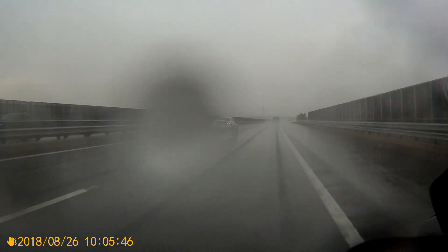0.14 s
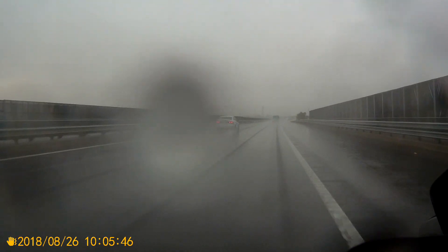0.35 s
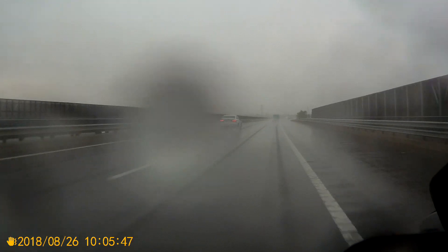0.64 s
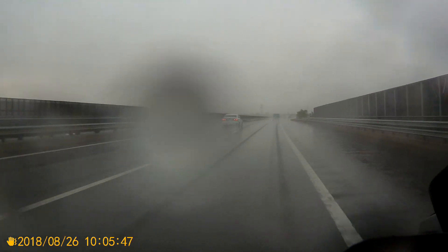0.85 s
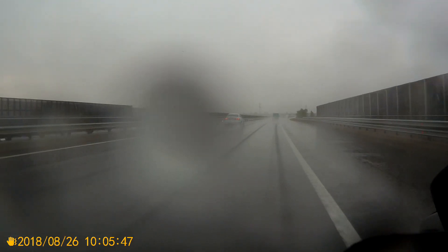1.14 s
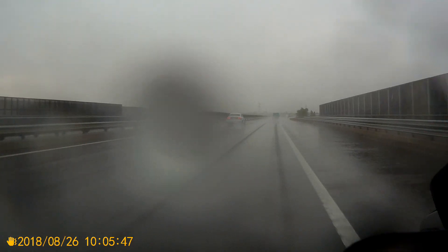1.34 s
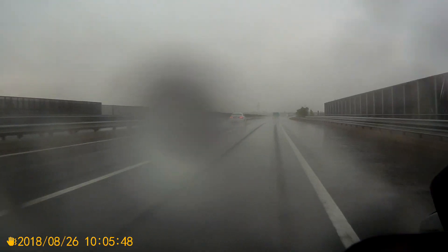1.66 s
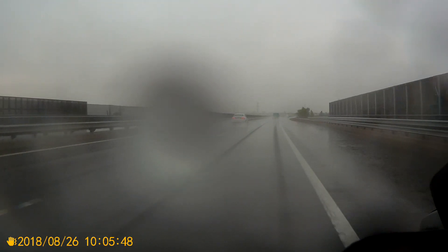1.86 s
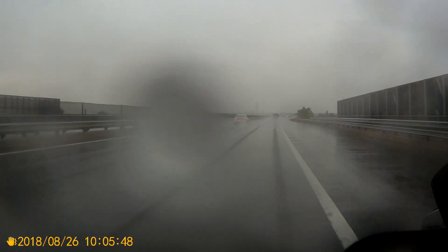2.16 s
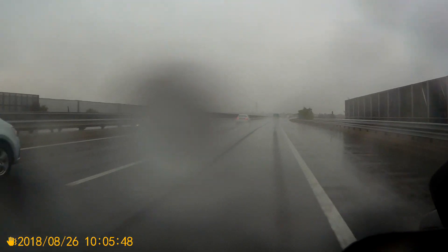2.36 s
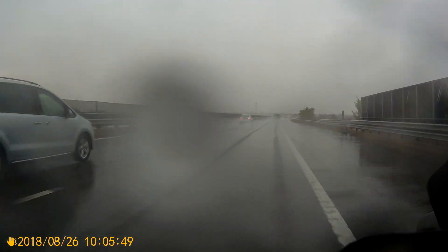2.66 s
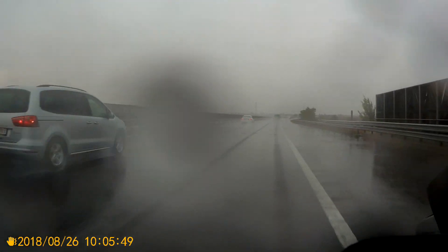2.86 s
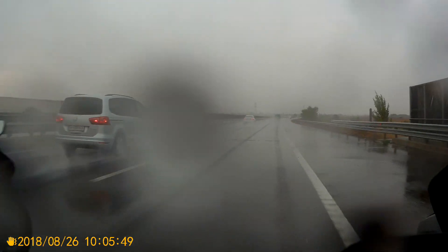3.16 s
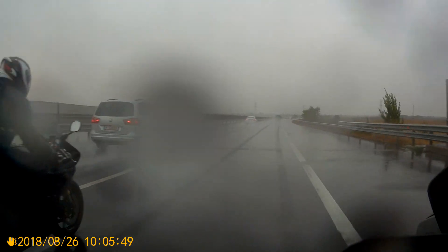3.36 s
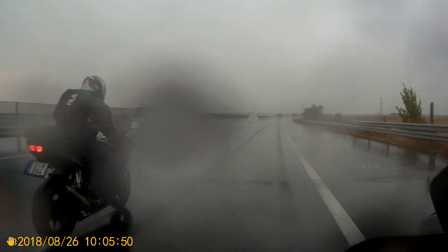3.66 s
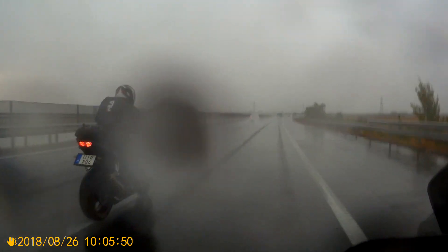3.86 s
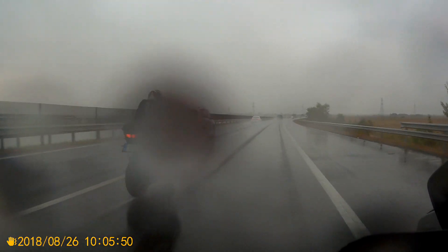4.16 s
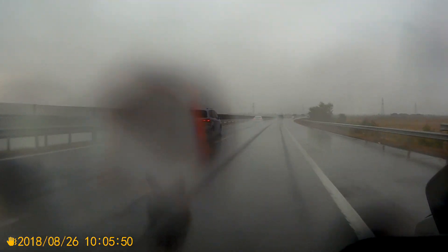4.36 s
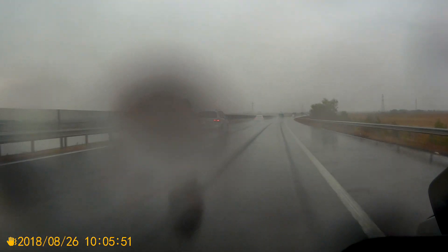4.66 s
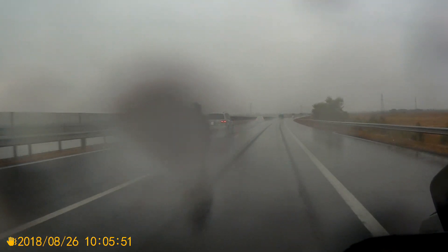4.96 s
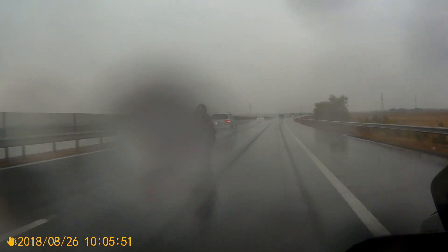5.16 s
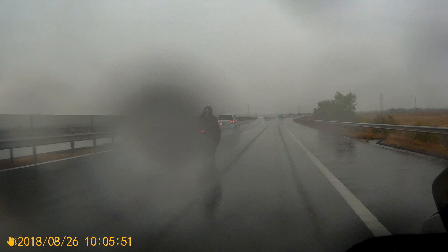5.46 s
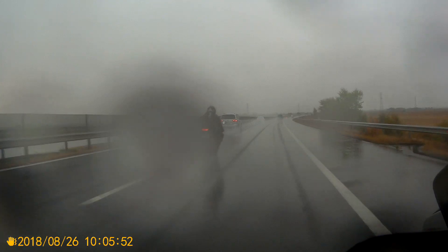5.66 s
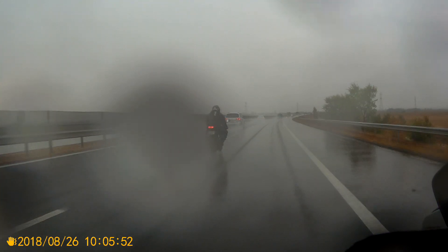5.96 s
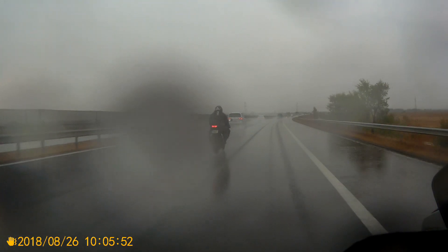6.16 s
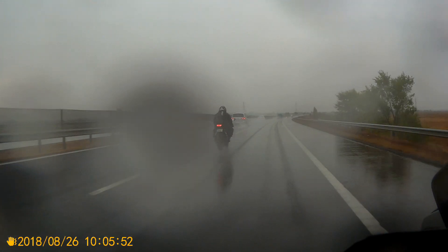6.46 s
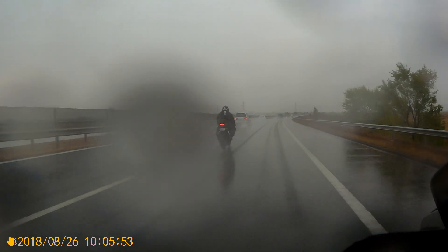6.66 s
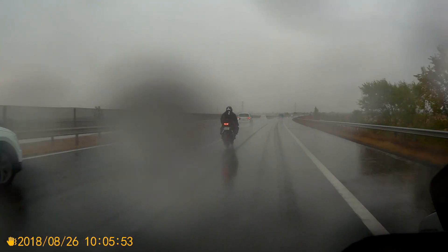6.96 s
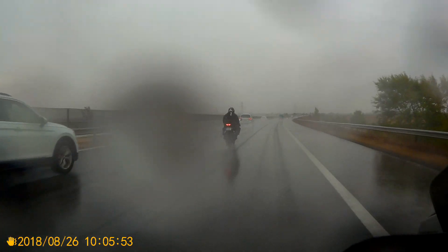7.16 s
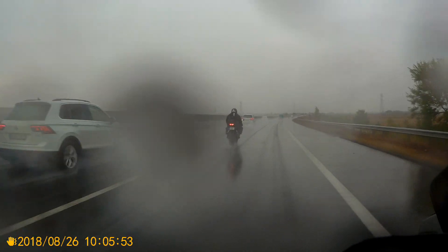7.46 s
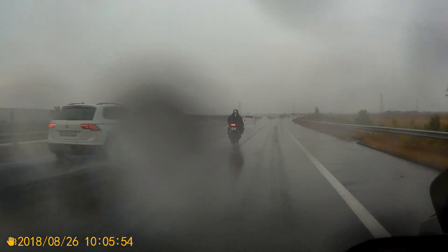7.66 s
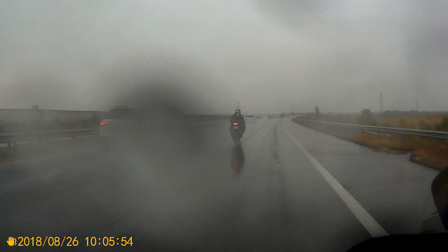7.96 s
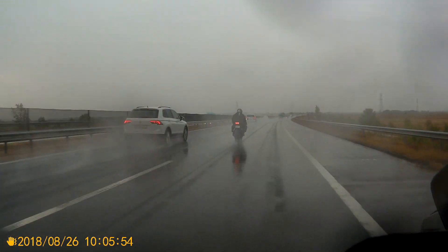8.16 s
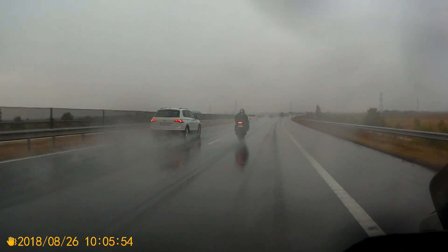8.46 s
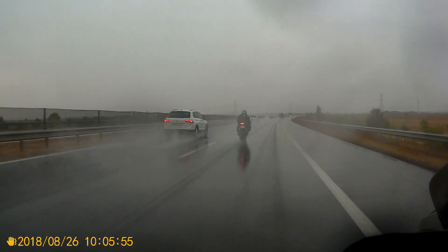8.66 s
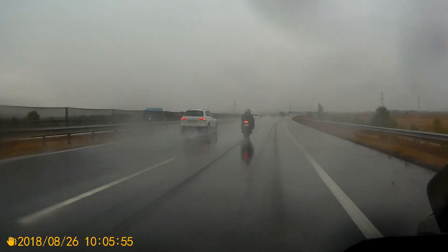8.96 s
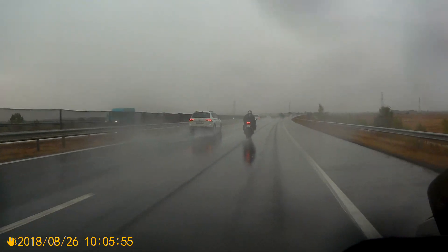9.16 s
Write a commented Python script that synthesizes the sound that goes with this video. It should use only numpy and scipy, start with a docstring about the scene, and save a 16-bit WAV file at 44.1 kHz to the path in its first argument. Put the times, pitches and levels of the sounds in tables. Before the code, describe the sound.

Steady throbbing motorbike engine and nasal gear whine over rumbling road noise, while rain snaps and crackles on a sealed camera and bumps thud softly.

```python
"""A motorcycle engine drones steadily at once, on a wet motorway, heard by a small camera sealed in a case
on the bike. Sines locked to the engine cycle make the exhaust and gear whine; firing clatter, throbbing
noise with a repeating pattern, rings in the camera mount. Coloured noise makes road roar, faint tyre hiss
and wind buffeting, and noise rings in the frame. Raindrops tick and crackle on the case, joints thud as
low decaying sines, and road jolts and grit strike short rings."""
import sys
import numpy as np
from scipy import signal
from scipy.fft import rfft, irfft
from scipy.io import wavfile

SR = 44100
rng = np.random.default_rng(int(sys.argv[2]) if len(sys.argv) > 2 else 0)


def to_wav(s):
    """Save 16-bit WAV."""
    ch = np.atleast_2d(s).T  # columns
    pcm = np.round(np.clip(ch, -1, 1) * 32767)  # PCM
    wavfile.write(sys.argv[1], SR, pcm.astype(np.int16))


N = 411012
TIME_S = np.arange(N) / SR


def from_db(db):
    """Turn decibels into an amplitude factor."""
    return 10 ** (np.asarray(db) / 20)


def rms_one(x):
    """Scale a signal to an rms of 1."""
    return x / np.sqrt(np.mean(x ** 2) + 1e-20)


def in_time(rows):
    """Draw straight lines between the (time, value) rows of a table."""
    s, values = np.transpose(rows)
    return np.interp(TIME_S, s, values)


def blow_at(s, level_db):
    """A single click at a given time."""
    blow = np.zeros(N)
    blow[round(s * SR)] = from_db(level_db)
    return blow


def drift(rate_hz):
    """Slow chance of spread 1: noise at every 40th sample through a double one-pole low-pass."""
    pole = np.exp(-80 * np.pi * rate_hz / SR)
    noise = rng.standard_normal(N // 40 + 2002)
    slow = signal.lfilter([1], [1, -2 * pole, pole * pole], noise)[2000:]  # drop the filter's start
    return np.interp(np.arange(N) / 40, np.arange(len(slow)), rms_one(slow))


def ring(clicks, hz, t60):
    """A struck mode: a unit click starts a sine of height 1 that decays by 60 dB in t60 seconds."""
    pole, turn = from_db(-60 / (t60 * SR)), 2 * np.pi * hz / SR
    # the tiny offset keeps the filter clear of denormal numbers
    return signal.lfilter([0, np.sin(turn)], [1, -2 * pole * np.cos(turn), pole * pole], clicks + 1e-18)


def resonate(x, hz, width_hz):
    """A resonance applied twice, so its skirts fall steeply; gain 1 on top."""
    pole = np.exp(-np.pi * width_hz * 1.55 / SR)  # each stage is wider, as two in a row narrow the peak
    gain = (1 - pole * pole) / 2
    stage = [gain, 0, -gain, 1, -2 * pole * np.cos(2 * np.pi * hz / SR), pole * pole]
    return signal.sosfilt([stage, stage], x)


def ringing(shake, modes):
    """A body's resonances in parallel, signs alternating; rms 1."""
    out = 0
    for k, (hz, width_hz, level_db) in enumerate(modes):
        out = out + (-1) ** k * from_db(level_db) * resonate(shake, hz, width_hz)
    return rms_one(out)


def coloured(spectrum, patchy_db, rate_hz):
    """Noise of the given colour, split in overlapping octave parts that each flicker on their own; rms 1."""
    hz, points = np.maximum(np.fft.rfftfreq(N, 1 / SR), 1), np.array(spectrum)
    level_db = np.interp(np.log(hz), np.log(points[:, 0]), points[:, 1], left=-150, right=-150)
    shaped = from_db(level_db) * rfft(rng.standard_normal(N))
    out = 0
    for octave in np.arange(np.floor(np.log2(points[0, 0])), np.log2(points[-1, 0]) + 1):
        part = np.cos(np.pi / 2 * np.clip(np.log2(hz) - octave, -1, 1)) ** 2
        out = out + from_db(patchy_db * drift(rate_hz)) * irfft(shaped * part, N)
    return rms_one(out)


def orders(cycle, table, waver_db, slip, sweep, smeared_to=np.inf):
    """Sines locked to the engine cycle waver and slip in phase; sweep smears the pulse up to an order; rms 1."""
    out = 0
    for k, level_db in table:
        phase = 2 * np.pi * k * cycle + sweep * min(k, smeared_to) ** 2 + slip * drift(3.45)
        out = out + from_db(level_db + waver_db * drift(2.86)) * np.cos(phase)
    return rms_one(out)


# Engine speed on the motorway: (time [s], speed [rpm])
ENGINE_SPEED = [(0.0, 3666), (0.9, 3648), (1.8, 3634), (2.5, 3618), (3.4, 3606), (3.9, 3614), (4.2, 3629),
                (4.8, 3648), (5.5, 3673), (6.6, 3700), (7.2, 3707), (7.8, 3701), (8.2, 3691), (8.7, 3667),
                (9.0, 3648), (9.32, 3639)]
CRUISE_RPM = 3650


def engine_motion():
    """Engine speed above cruise (rpm) and running count of cycles; a four-stroke cycle takes two turns."""
    rpm = in_time(ENGINE_SPEED)
    return rpm - CRUISE_RPM, np.cumsum(rpm / 120) / SR


# Exhaust orders: (multiple of the cycle rate, relative level [dB])
EXHAUST_ORDERS = [(1, -6), (2, -11.5), (3, -21), (4, -5), (5, -25), (6, -7), (7, 0), (8, -1), (9, -6),
                  (10, -10), (11, -11), (12, -5), (13, -9), (14, -11), (15, -6), (16, -10), (17, -16),
                  (18, -15), (19, -21), (20, -27)]
# The pipe smears the low orders: level waver [dB], phase slip [rad], phase sweep [rad], last smeared order
EXHAUST_STEADINESS = dict(waver_db=1.6, slip=.2, sweep=.6, smeared_to=12)
EXHAUST_DB, EXHAUST_DB_PER_RPM = -23.5, 0.0232  # level at cruise, rise with engine speed


def exhaust(cycle, above_cruise_rpm):
    """Exhaust pulses repeat each cycle, so they sum to orders of it; they grow with engine speed."""
    level = from_db(EXHAUST_DB + EXHAUST_DB_PER_RPM * above_cruise_rpm)
    return level * orders(cycle, EXHAUST_ORDERS, **EXHAUST_STEADINESS)


# Resonances of the camera mount: (frequency [Hz], width [Hz], relative level [dB])
MOUNT_MODES = [(713, 48, -18.5), (1244, 60, -19), (1387, 45, -0.5), (1460, 88, -6), (1556, 174, -4.5),
               (1736, 143, -17), (1830, 173, -12), (2367, 324, -22.5), (3369, 92, -23)]


def mount(shake):
    """The camera mount rings at its resonances when shaken; rms 1."""
    return ringing(shake, MOUNT_MODES)


# Gear teeth: (multiple of the cycle rate, level before the mount [dB])
GEAR_TEETH = [(45, 2), (48, 5), (63, 1)]
WHINE_DB, CLATTER_DB = -29, -24  # levels at cruise
CLATTER_DB_PER_RPM = 0.0175  # rise of both with engine speed


def gear_whine(cycle, above_cruise_rpm):
    """Gear teeth mesh at fixed multiples of the cycle rate and set the mount ringing."""
    level = from_db(WHINE_DB + CLATTER_DB_PER_RPM * above_cruise_rpm)
    return level * mount(orders(cycle, GEAR_TEETH, waver_db=0.6, slip=0.24, sweep=0.3))


def firing_clatter(cycle, above_cruise_rpm):
    """Firings shake the camera mount: a pattern that repeats every cycle, plus noise that throbs with it."""
    turn = 2 * np.pi * cycle
    throb = 1 + 0.19 * np.cos(turn) + 0.45 * np.cos(2 * turn + 0.38) + 0.26 * np.cos(4 * turn + 0.72)
    equal_orders = [(k, 0) for k in range(39, 66)]
    pattern = orders(cycle, equal_orders, waver_db=2.0, slip=0.66, sweep=np.pi / 2 * 1.02)
    shake = throb * rng.standard_normal(N) + from_db(-14.5) * pattern
    return from_db(CLATTER_DB + CLATTER_DB_PER_RPM * above_cruise_rpm) * mount(shake)


# Colour of the road roar: (frequency [Hz], relative density [dB])
ROAR_COLOUR = [(60, -26), (80, -6.5), (110, -11), (140, -6), (200, -7), (290, -7.5), (410, -15.5),
               (450, -7), (560, -9), (630, -20.5), (900, -22), (1150, -24.5), (1400, -53)]
# The roar swells and sinks: (time [s], rise [dB])
ROAR_RISE = [(0, 3), (.6, -0.5), (2.1, 1.1), (2.6, -2), (4.0, 0), (6.0, -0.9), (7.3, -1.1), (8.3, 1),
             (9.32, 2)]
ROAR_DB = -32


def road_roar():
    """Road roar is low coloured noise that flickers in octave parts and swells and sinks."""
    return from_db(ROAR_DB + in_time(ROAR_RISE)) * coloured(ROAR_COLOUR, patchy_db=2.0, rate_hz=9.1)


# Resonances of frame and fairing: (frequency [Hz], width [Hz], relative level [dB])
FRAME_MODES = [(258.8, 13.4, 0.5), (229, 23, -15), (344.8, 26.6, -1), (386, 23, -7), (522, 34, -20)]
FRAME_DB = -29  # wanders about this level


def frame_ring():
    """The road shakes frame and fairing at random, and they ring at their resonances."""
    return from_db(FRAME_DB + 2.2 * drift(9.1)) * ringing(rng.standard_normal(N), FRAME_MODES)


# Colour of the tyre spray: (frequency [Hz], relative density [dB])
SPRAY_COLOUR = [(1000, -18.5), (1700, 0), (1940, -16), (2100, -25.5), (2490, -12), (2680, -17),
                (3400, -18.5), (4280, -29.5), (7420, -39), (8980, -50), (10400, -46), (12100, -50),
                (14900, -38), (15700, -46), (16500, -77)]
SPRAY_DB = -34  # wanders about this level


def tyre_spray():
    """Tyre spray is a faint hiss of coloured noise with small, quick changes of level."""
    return from_db(SPRAY_DB + 0.44 * drift(4.5)) * coloured(SPRAY_COLOUR, patchy_db=1.2, rate_hz=20.0)


# Colour of the wind buffeting: (frequency [Hz], relative density [dB])
BUFFET_COLOUR = [(12, -32), (20, -6), (28, -2), (45, -0.5), (62, 2), (75, -21), (110, -40)]
# Two gusts, at the start and near 4 s; a row of 0 dB adds nothing: (time of the top [s], rise [dB])
WIND_GUSTS = [(0.0, 7), (3.95, 5), (4.6, 0)]
GUST_S, BUFFET_DB = 0.2, -32.5  # time to fall to 1/e of the dB rise; level between gusts


def wind_buffet():
    """Wind buffets as very low noise, raised by two bell-shaped gusts."""
    gust_db = sum(db * np.exp(-((TIME_S - s) / GUST_S) ** 2) for s, db in WIND_GUSTS)
    return from_db(BUFFET_DB + gust_db) * coloured(BUFFET_COLOUR, patchy_db=1.0, rate_hz=6.4)


# Larger raindrops on the case; knock, body and fizz are relative to the drop's level:
# (listed time [s], level [dB], knock [dB], body [dB], fizz [dB])
LARGE_DROPS = [(0.0291, -36, -7, -9, -6), (0.2239, -17, -14, -7, -16), (0.739, -32.5, -12, -10, -12),
               (0.7971, -30, -3, 5.5, -16), (0.9268, -6.5, -17, -8.5, -19.5), (1.3159, -33, -11.5, -3, -27),
               (1.4413, -12.5, -11, 0, -55), (1.5579, -32.5, -14, -7, -6), (2.1465, -25.5, -14, -15, -19),
               (2.4239, -29, -16, -11, -12), (2.4703, -33, -4, -2, -50), (2.4885, -13.5, -5, -8, -51),
               (2.7038, -25.5, -18, -6, -12), (2.7926, -11, 4.5, -2, -47), (2.9375, -34, -13, -6, -7),
               (2.9891, -35, -11, -2, -8), (3.1901, -33, -10, -1, -18), (3.5404, -36, -11, -4, -4),
               (3.575, -34, -6, 9, -16), (3.714, -33.5, -8, 4, -10), (3.7538, -31, -8, -8, -14),
               (3.7986, -24, -21, -3, -8.5), (3.9724, -33, -8, 7, -35), (4.0741, -38, -12, -4, -7),
               (4.1774, -26.5, -15, -3, -12), (4.188, -33, -12, -5, -10), (4.2263, -30, -12, 1, -17),
               (4.4109, -15, -12, -13, -10), (4.5727, -18, -26, -11, -11), (4.689, -25.5, -17, -6, -11),
               (4.8883, -22, -20, -16, -13), (5.013, -17, -25, -16, -12.5), (5.1698, -25, -11.5, -1, -17),
               (5.8586, -25, -15, -13, -17), (5.9374, -35, -12, -11, -9), (6.074, -32, -8, -11, -10),
               (6.113, -32, -12, -16, -11), (6.2042, -16.5, -5, -16, -13.5), (6.5418, -31, -17, -13, -8),
               (6.8264, -25, 6, 1.5, -14), (6.8731, -23.5, -16, -4, -8.5), (7.008, -28, -6, -19, -19),
               (7.1117, -24, -18, 2.5, -16), (7.245, -29.5, -20, -19.5, -7), (7.346, -24, -16, -15, -14),
               (7.4165, -23, -20, -23, -15), (7.651, -31, -1, -7, -36), (7.6725, -2.5, -6.5, -11.5, -58),
               (7.9322, -25.5, -16, -4, -14), (8.0292, -31, -11, -9, -9), (8.0511, -11, -9, -2.5, -18),
               (8.1479, -31.5, -14, -9, -8), (8.3539, -17.5, -21, -12, -15), (8.5, -30, -14, -18, -8),
               (8.6113, -30, -8, 0, -16), (8.704, -33.5, -10, -11, -7), (8.777, -33.5, -19, -12, -5),
               (8.8327, -31, -10, -6, -12), (8.984, -26, -14, -10, -15), (9.0444, -21.5, -21, -6, -11),
               (9.0623, -30, -5, -7, -18), (9.1022, -5, -4, -9.5, -57), (9.2895, -12, -25, -19, -18.5)]
# Middle knock, body and fizz of a fine drop, relative to its level: [dB] each
FINE_DROP_SHARES = (-9, -11, -12)
# Knock, body, crack, fizz and a soft treble hiss:
# (low edge [Hz], high edge [Hz], tap gain [dB], splash gain [dB], rise and fade [s])
SPLASH_BANDS = [(985, 2340, 29, 11, 0.00023), (1340, 4120, 23, 7.5, 0.00078),
                (3630, 7480, 10.5, -6, 0.00061), (8800, 20000, 22, 5.5, 0.00045),
                (4800, 13000, -21, -14.5, 0.0098)]
# Camera case resonances, added to the splashes: (frequency [Hz], width [Hz], gain [dB])
CASE_MODES = [(3170, 530, -7.5), (6380, 2800, -6.5), (10760, 1500, -8), (12900, 400, -5), (15200, 690, 5)]
FINE_PER_S, FINE_DB, FINE_SPREAD_DB, FINE_COLOUR_DB = 22, -49.5, 4.0, 8.0
ONSET_DELAY_S = 0.00073  # every tap and splash starts this long after its listed time


def drizzle():
    """Fine drops land at random, mostly small, with chance colour; rows as in LARGE_DROPS."""
    at = np.flatnonzero(rng.random(N) < FINE_PER_S / SR)
    luck = rng.random((len(at), 4))
    level_db = FINE_DB + FINE_SPREAD_DB * np.minimum(-np.log(1 - luck[:, 0]), 3)
    shares_db = FINE_DROP_SHARES + FINE_COLOUR_DB * (2 * luck[:, 1:] - 1)
    return np.column_stack([at / SR, level_db, shares_db])


def rain():
    """Each drop taps and crackles in four bands; a faint treble hiss swells and fades; the case resonates."""
    s, drop_db, knock_db, body_db, fizz_db = np.concatenate([LARGE_DROPS, drizzle()]).T
    at = np.minimum(np.round((s + ONSET_DELAY_S) * SR).astype(int), N - 1)
    crackle = rng.choice([-1., 1.], N)
    shares_db = (knock_db, body_db, 0, fizz_db, fizz_db)  # the soft hiss shares the fizz level
    out = 0
    for (low_hz, high_hz, tap_db, splash_db, burst_s), share_db in zip(SPLASH_BANDS, shares_db):
        hits = np.zeros(N)
        hits[at] = from_db(drop_db + share_db)
        fade = np.exp(-1 / (burst_s * SR))
        envelope = signal.lfilter([1], [1, -2 * fade, fade * fade], hits + 1e-18)
        burst = envelope * (1 - fade) * np.e * crackle  # the scaling tops the envelope near the hit's height
        blow = from_db(tap_db) * hits + from_db(splash_db) * burst
        band = signal.butter(4, [low_hz, high_hz], "band", fs=SR, output="sos")
        out = out + signal.sosfilt(band, blow)
    return out + sum(from_db(db) * resonate(out, hz, width_hz) for hz, width_hz, db in CASE_MODES)


# Road joints under the wheels: (time [s], blow before softening [dB], frequency [Hz])
ROAD_JOINTS = [(0.031, -13, 38), (.13, -19, 45.2), (.3, -27, 42.2), (3.856, -7, 40.3), (3.936, -14, 46),
               (4.589, -21, 35), (8.51, -12.5, 39.8)]


def suspension_thuds():
    """Joints set the frame swinging for a few cycles; a low-pass softens the blows."""
    out = 0
    for s, blow_db, hz in ROAD_JOINTS:
        out = out + ring(blow_at(s, blow_db), hz, t60=0.31)
    return signal.sosfilt(signal.butter(2, 90, fs=SR, output="sos"), out)


# Road jolts: the fairing rings briefly: (time [s], blow before softening [dB])
FRAME_JOLTS = [(.055, -20), (.298, -11.5), (.363, -16), (.462, -10), (2.11, -11), (3.969, -18),
               (8.516, -8.5), (8.7, -15)]
# Grit on small parts: (time [s], blow before softening [dB], frequency [Hz])
GRIT_PINGS = [(1.5, -15, 970), (4.72, -13, 2260)]
FAIRING_HZ, FAIRING_T60_S = 352.7, 0.097
GRIT_CYCLES = 15  # cycles in which a ping decays by 60 dB


def jolts_and_grit():
    """Road jolts knock the fairing and grit pings off small parts; each rings briefly."""
    blows = [(s, db, FAIRING_HZ, FAIRING_T60_S) for s, db in FRAME_JOLTS]
    blows += [(s, db, hz, GRIT_CYCLES / hz) for s, db, hz in GRIT_PINGS]
    out = 0
    for s, blow_db, hz, t60 in blows:
        struck = ring(blow_at(s, blow_db), hz, t60)
        out = out + resonate(struck, hz, width_hz=hz / 3)  # soft contact: the ring swells in
    return out


def scene():
    """Engine layers follow engine speed; road, spray, wind, rain and blows are added beside them."""
    above_cruise_rpm, cycle = engine_motion()
    engine = exhaust(cycle, above_cruise_rpm) + gear_whine(cycle, above_cruise_rpm)
    engine = engine + firing_clatter(cycle, above_cruise_rpm)
    road_and_wind = road_roar() + frame_ring() + tyre_spray() + wind_buffet()
    strikes = rain() + suspension_thuds() + jolts_and_grit()
    return (engine + road_and_wind + strikes)[None]


MICROPHONE_TOP_HZ, CUTOFF_HZ = 14600, 16750


def record(dry):
    """At the microphone in the case, peaks are rounded, the high treble fades and the top is cut."""
    rounded = 0.87 * np.tanh(dry / 0.94)
    heard = signal.sosfilt(signal.butter(6, MICROPHONE_TOP_HZ, fs=SR, output="sos"), rounded)
    return signal.sosfilt(signal.cheby2(24, 45, CUTOFF_HZ, fs=SR, output="sos"), heard)


dry = scene()
out = record(dry)
to_wav(out)
```